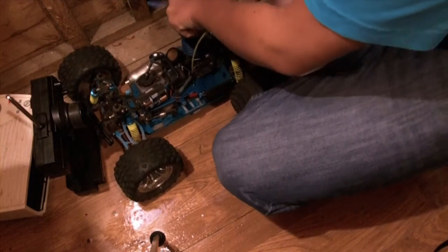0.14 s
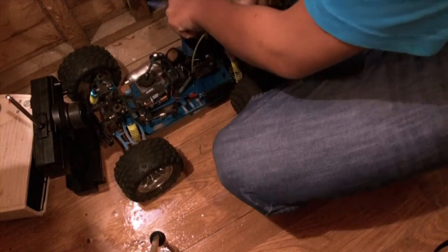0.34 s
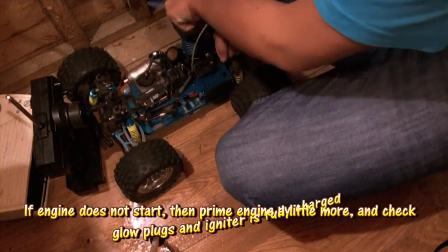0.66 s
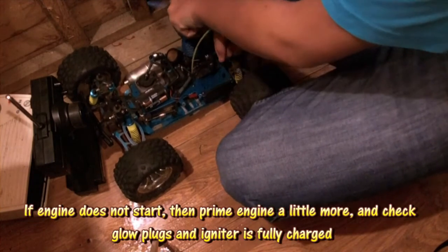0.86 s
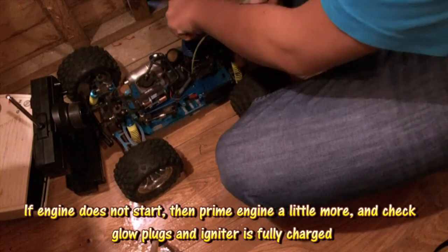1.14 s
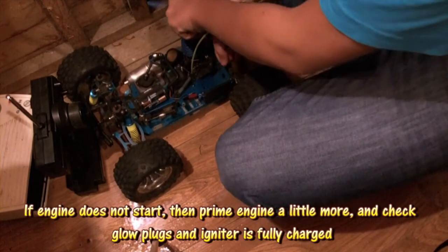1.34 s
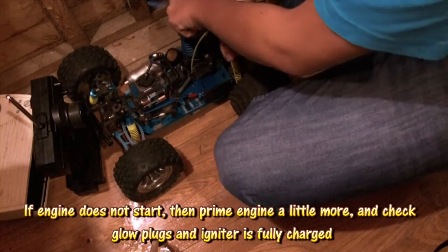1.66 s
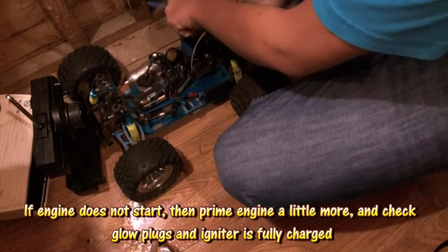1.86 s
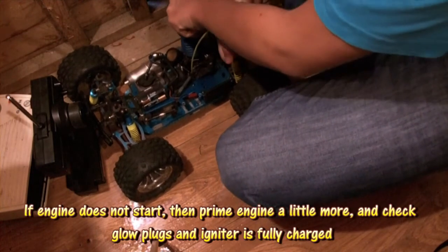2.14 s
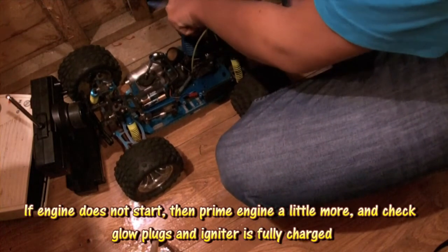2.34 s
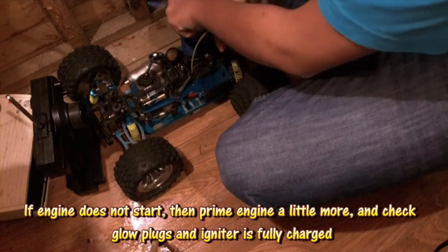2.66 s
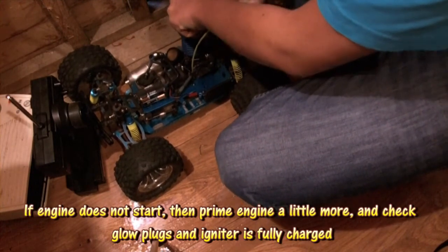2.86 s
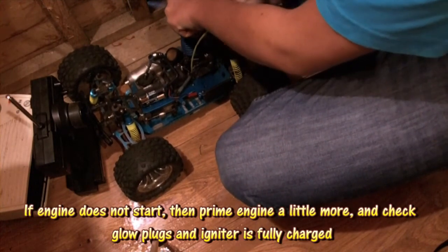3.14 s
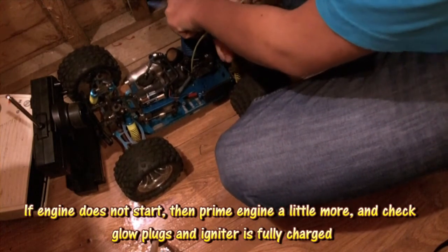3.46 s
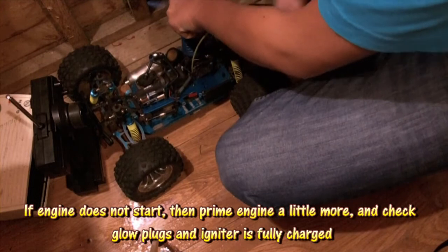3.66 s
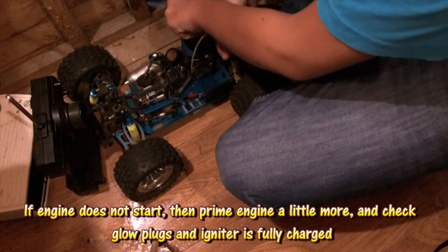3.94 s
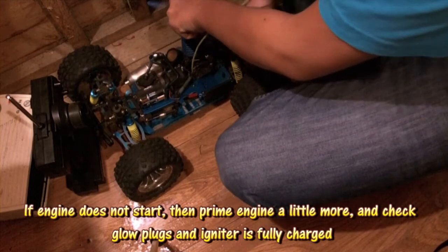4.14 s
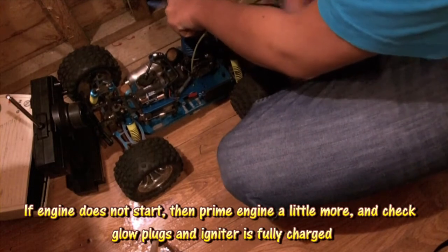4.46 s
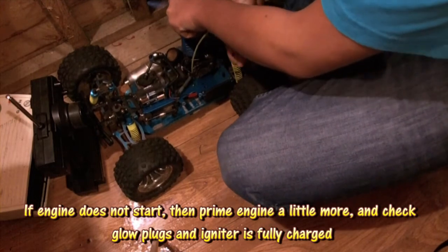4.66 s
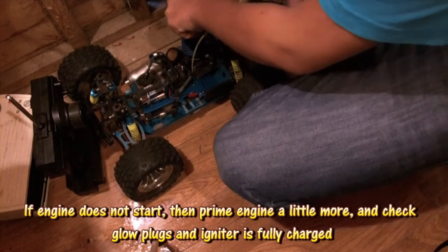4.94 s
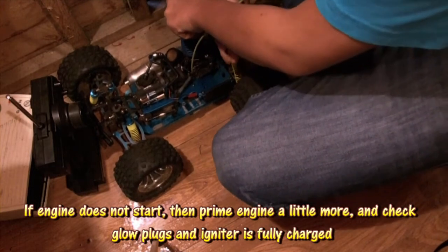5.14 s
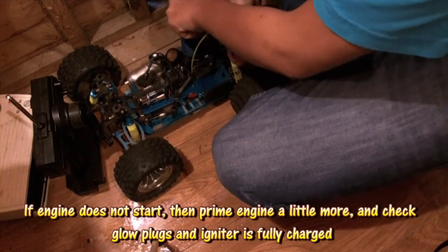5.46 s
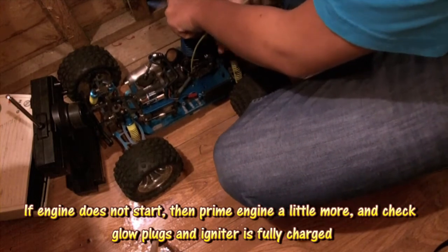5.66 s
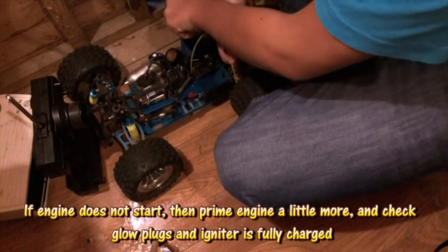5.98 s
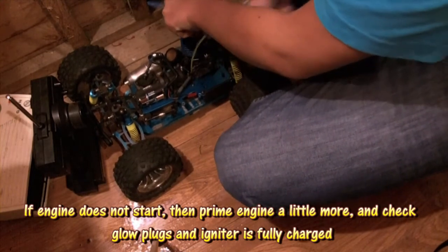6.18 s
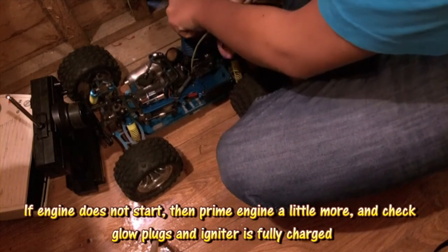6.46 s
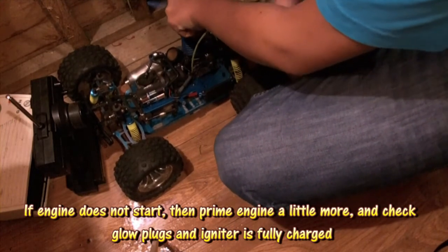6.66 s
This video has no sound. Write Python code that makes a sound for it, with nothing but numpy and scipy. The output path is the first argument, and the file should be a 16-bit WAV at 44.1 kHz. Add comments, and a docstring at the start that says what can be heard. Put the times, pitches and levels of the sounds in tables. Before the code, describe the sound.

Quick, repeated rasps of a starter cord turn over a tiny engine that never catches, the handle clacking back between pulls.

```python
"""A model car's pull-starter, yanked fifteen times; the cold glow engine never fires.
Small wooden shed, microphone just above the car. Each yank snaps the cord taut, the starter bites,
and three or four compression strokes puff through the silencer while the cord rasps out.
The spring winds the cord back and the handle clacks home. Hands and car shift with dull taps,
the close walls answer, and a soft room tone lies underneath."""
import sys
import numpy as np
from scipy import signal
from scipy.fft import rfft, irfft
from scipy.io import wavfile

SR = 44100
rng = np.random.default_rng(int(sys.argv[2]) if len(sys.argv) > 2 else 0)


def transcribe(u):
    """Save the signal u as a 16-bit wav file named by the first command-line argument.

    u: samples, shape (n,) or (channels, n), limited to [-1, 1]; the rate is SR.
    q: integer samples, one column per channel.
    """
    v = np.clip(np.atleast_2d(u).T, -1, 1)
    q = np.round(v * 32767).astype(np.int16)
    wavfile.write(sys.argv[1], SR, q)


N = 300497
TIME = np.arange(N) / SR
FULL_RUN_S = .076  # cord run of a full yank

# yanks: bite t/s, relative level/dB, cord run/s, taut snap's lead on the bite/s, relative snap level/dB
YANKS = [ (.2570, 3.5, 0.059, 0.042, -42.5), (1.0939, 2.5, 0.074, 0.04, -40.5),
         (1.5842, 4, 0.063, 0.051, -42.5), (2.0200, 3, .063, .055, -50), (2.4480, 3.5, 0.063, 0.06, -43.5),
         (2.8720, 2.5, 0.067, .053, -46), (3.3056, 3, 0.059, .048, -41.5), (3.7212, 3.5, 0.074, .042, -37),
         (4.1477, 4, 0.077, .048, -40.5), (4.5990, 3.5, 0.073, 0.04, -33.5),
         (5.0026, 3.5, .076, 0.0454, -36.5), (5.4281, 3.5, 0.071, 0.039, -31.5),
         (5.8692, 3.5, 0.078, .0385, -35), (6.3292, 4, 0.058, 0.051, -55), (6.7145, 3.5, .082, .037, -33)]
# crank pace in a full yank: stroke to stroke/s
STROKE_GAPS = [.0203, .0184, .0196]
# handle clacking home: t/s, relative level/dB, treble/dB
HANDLE_CLACKS = [(0.4113, -42.5, 8), (1.252, -35, -13), (1.721, -37, 5), (2.141, -31, 2), (2.584, -28, 1.5),
                 (3.003, -29.5, 6.5), (3.436, -29.5, 5.5), (3.8815, -30, 2), (4.2788, -27, 4),
                 (4.728, -33, -13), (5.181, -51, 20), (5.5606, -31, 1), (6.011, -27.5, 1.5),
                 (6.451, -32, 2)]
# car and hands shifting: t/s, level/dB, f/Hz
HANDLING_TAPS = [(0.038, -45, 1600), (.075, -52, 1970), (.672, -43.5, 1740), (0.806, -47, 1620),
                 (.8362, -36, 1590), (0.9352, -43, 1070), (1.0534, -37, 1580), (2.703, -47.5, 1520),
                 (2.842, -40.5, 1070), (3.074, -40, 1070)]
# room tone at the microphone: t/s, level/dB
ROOM_LEVELS = [(0, -58.5), (1.6, -60), (3.6, -58), (5.3, -57.5), (6.8, -57.5)]
# spectra of the sources: f/Hz, relative level/dB
ROOM_SPECTRUM = [(12, -32), (20, -14), (68, -17.5), (137, -21), (238, -8.5), (439, -6), (614, -3),
                 (985, -1), (1070, -7), (1200, -4), (1920, -6.5), (2540, -14), (5850, -14), (13500, -20),
                 (15500, -23)]
TAUT_SPECTRUM = [(180, -13.5), (300, -1.5), (1300, -8), (2000, 6), (2280, 0), (2690, 5), (3570, -1),
                 (3940, 3.5), (6680, -5.5), (9930, 5), (15500, -35)]
RASP_SPECTRUM = [(40, -25.5), (110, -38), (200, -18.5), (450, 0.5), (620, -7.5), (1000, -3), (1800, 1),
                 (2700, -7.5), (3800, -3.5), (6500, -5), (9000, -1.5), (11000, -3), (13300, -21.5),
                 (15200, -24)]
CLACK_SPECTRUM = [(88, -49), (150, -26.5), (827, -6), (1060, -1.5), (1220, -1), (1660, -3), (1800, 1.5),
                  (2140, -5), (2600, -4), (4930, -13.5), (7270, -13), (10900, -21), (15500, -42)]
TAP_SPECTRUM = [(100, -14), (300, 1), (500, 8), (800, 6), (1500, 7.5), (3000, -.5), (6000, -10.5),
                (9000, -5), (15000, -31)]
SCRAPE_SPECTRUM = [(100, -7.5), (400, .5), (750, -19), (1020, 8.5), (1300, -.5), (1950, -3.5),
                   (3000, -7.5), (12000, -18.5)]
# resonances of crankcase, starter housing and chassis: f/Hz, width/Hz, boost/dB
BODY_MODES = [(688, 40, 5), (885, 40, 4.5), (995, 45, 6), (1208, 50, 3.5), (1535, 70, 4.5), (1797, 60, 7.5),
              (1965, 110, 9.5), (3510, 180, 3.5), (3950, 170, 4.5), (5250, 400, 3), (5720, 300, 2.5),
              (7080, 300, 2), (8560, 180, 4.5), (9000, 150, 2), (9660, 150, 2.5), (12920, 170, 13)]
# the silencer's two chambers: f/Hz, width/Hz
SILENCER_MODES = [(375, 52), (442, 48)]
# chassis and floorboards under the car: f/Hz, width/Hz, level against the pop/dB
FLOOR_MODES = [(198, 26, -31), (218, 24, -28), (258, 35, -24), (502, 25, -18), (688, 40, -22)]
# nearest walls: delay/ms, relative gain
WALL_ECHOES = [(10.35, .3), (14.82, .9), (16.1, .72), (20.95, -.28)]


def undb(db):
    """Decibels to gain."""
    return 10 ** (np.asarray(db) / 20)


def unit(x):
    """Scale to rms 1."""
    return x / np.sqrt(np.mean(x ** 2))


def convolve(x, response):
    """Pass a sound through an impulse response."""
    return signal.fftconvolve(x, response)[:N]


def colour(x, spectrum, peaks=()):
    """Causal filter of unit power from a smooth spectrum with resonances on top."""
    bins_hz = np.maximum(np.fft.rfftfreq(8192, 1 / SR), 1)
    hz, db = np.transpose(spectrum)
    curve_db = np.interp(np.log(bins_hz), np.log(hz), db)
    for centre, width, boost in peaks:
        curve_db += boost / (1 + (2 * (bins_hz - centre) / width) ** 2)
    cepstrum = irfft(np.log(undb(curve_db)))
    half = len(cepstrum) // 2
    cepstrum[1:half] *= 2  # fold to minimum phase
    cepstrum[half + 1:] = 0
    response = irfft(np.exp(rfft(cepstrum)))
    return convolve(x, response / np.linalg.norm(response))


def resonate(x, hz, width):
    """One resonance, gain 1 at its centre."""
    return signal.lfilter(*signal.iirpeak(hz, hz / width, fs=SR), x)


def treble(x, hz):
    """The part of a sound above a gentle corner."""
    return signal.lfilter(*signal.butter(1, hz, "high", fs=SR), x)


def burst(start, fade_s, rise_s=.0014):
    """Envelope of a quick rise and an exponential fade."""
    out = np.zeros(N)
    span = slice(int(start * SR), int((start + .5) * SR))
    age = np.maximum(TIME[span] - start, 0)
    out[span] = (1 - np.exp(-age / rise_s)) * np.exp(-age / max(fade_s, rise_s))
    return out


def grit(rate, spread_db):
    """Dense tiny slips of uneven size, about rate a second."""
    slips = (rng.random(N) < rate / SR) * rng.standard_normal(N)
    return unit(slips * undb(spread_db * rng.standard_normal(N)))


def wander(rate):
    """A smooth random curve with rate new values a second."""
    moments = np.arange(0, N / SR, 1 / rate)
    return np.interp(TIME, moments, rng.standard_normal(len(moments)))


def shed(x, wet_db, echo_db=-10, build_s=.0012, t60_s=.23, sway_hz=1.7):
    """Close wooden walls answer with a few echoes and a short tail that shifts as the arm moves."""
    age = TIME[:SR // 2]
    early = np.zeros(len(age))
    for ms, gain in WALL_ECHOES:
        early[round(ms * SR / 1000)] += undb(echo_db) * gain
    out = x + convolve(x, early)
    fade = undb(-60 * age / t60_s) * (1 - np.exp(-age / build_s))
    for phase in (0, np.pi / 3, 2 * np.pi / 3):  # three tails crossfade at constant power
        tail = rng.standard_normal(len(age)) * fade
        share = np.sqrt(2 / 3) * np.cos(2 * np.pi * sway_hz * TIME + phase)
        out += undb(wet_db) * share * convolve(x, tail / np.linalg.norm(tail))
    return out


def rattle(events, spectrum, fade_s, gain_db, snap_db, snap_s):
    """A snap and a flurry of contacts ring the starter housing; events: t/s, level/dB, treble/dB."""
    force, bright = np.zeros((2, N))
    for start, db, treble_db in events:
        flurry = burst(start - .001, fade_s, rise_s=.0031)
        snap = undb(snap_db) * burst(start, snap_s)
        blow = undb(db + gain_db) * (flurry + snap)
        force += blow
        bright += blow * (undb(treble_db) - 1)
    contacts = grit(rate=12000, spread_db=1) * undb(1.5 * wander(rate=160))
    # small parts stir the body less than a yank
    modes = [(hz, width, db / 2) for hz, width, db in BODY_MODES]
    return colour(force * contacts + treble(bright * contacts, hz=3840), spectrum, modes)


def room_tone():
    """The shed's own air, a steady, soft rush."""
    level_db = np.interp(TIME, *np.transpose(ROOM_LEVELS))
    return undb(level_db) * colour(rng.standard_normal(N), ROOM_SPECTRUM)


def handling_taps(push_s=.0024, ring_db=-12.5):
    """Soft, dull knocks of plastic and fingers leave the chassis ringing briefly."""
    out = np.zeros(N)
    touch = colour(rng.standard_normal(N), TAP_SPECTRUM)
    for start, db, hz in HANDLING_TAPS:
        push = np.exp(-((TIME - start) / push_s) ** 2 / 2)
        envelope = push + undb(ring_db) * burst(start + push_s, fade_s=.026)
        broad = unit(resonate(touch, hz, width=1900))
        narrow = unit(resonate(touch, hz, width=hz / 10))
        knock = envelope * (broad + .22 * narrow)
        out += undb(db) * knock * np.linalg.norm(envelope) / np.linalg.norm(knock)
    return out


def cord_snaps(middling_db=-37.5, brighten=.63):
    """The slack runs out and the cord snaps taut, brighter the harder it snaps."""
    snaps = [(bite - lead, db, -6 + brighten * (db - middling_db)) for bite, _, _, lead, db in YANKS]
    housing = rattle(snaps, TAUT_SPECTRUM, fade_s=.0095, gain_db=-.5, snap_db=-21, snap_s=.0025)
    return shed(housing, wet_db=-12.5)


def cord_slide(level_db=-50, lead_s=.023):
    """Just before the bite the cord slides with a soft, low scrape."""
    ramp_s = [-1.3 * lead_s, -.7 * lead_s, 0]
    swell = sum(np.interp(TIME - bite, ramp_s, [0, .8, 1], right=0) for bite, *_ in YANKS)
    return undb(level_db) * swell * colour(rng.standard_normal(N), SCRAPE_SPECTRUM, BODY_MODES)


def strokes(bite, run, carry_s=.006):
    """Moments at which the piston passes compression: three in a short yank, four in a full one."""
    slowing = (FULL_RUN_S / run) ** .296  # shorter yanks turn the crank a little slower
    delays = np.cumsum([0, *STROKE_GAPS]) * slowing
    return bite + delays[delays < run - carry_s]  # some cord must remain to carry the piston over


def cranking(rasp_db=-28.5, spit_db=-29, treble_db=-6):
    """The cord rasps louder as the hand speeds up, and air spits at each stroke."""
    cord, air = np.zeros((2, N))
    for bite, db, run, *_ in YANKS:
        speed = np.interp(TIME - bite, [0, .72 * run, run], [.51, 1, .95], left=0, right=0)
        coast = .63 * burst(bite + run, fade_s=.0081)
        clutch = undb(-6) * burst(bite, fade_s=.0013, rise_s=.00051)  # the one-way clutch snaps shut
        cord += undb(db) * (speed + coast + clutch)
        air += undb(db) * sum(burst(moment, fade_s=.0064) for moment in strokes(bite, run))
    rasp = undb(rasp_db) * cord * grit(rate=12000, spread_db=1)
    spit = undb(spit_db) * air * rng.standard_normal(N)
    spit += .49 * treble(spit, hz=7000)  # escaping air is brighter than the cord
    sound = colour(rasp + spit, RASP_SPECTRUM, BODY_MODES)
    return sound + (undb(treble_db) - 1) * treble(sound, hz=3350)


def silencer_pops(gain_db=-41.8, swell_db=1.3, lag_s=.00324):
    """Each stroke drops a slug of unburnt air into the silencer, which answers with a hollow pop."""
    slugs = np.zeros(N)
    for bite, _, run, *_ in YANKS:
        for k, moment in enumerate(strokes(bite, run)):
            # a long yank drives harder, and its middle strokes hardest
            swell = undb(swell_db * np.sin(np.pi * k / len(STROKE_GAPS)))
            slugs[int((moment + lag_s) * SR)] = -swell * np.sqrt(run / FULL_RUN_S)
    pop = slugs
    for hz, width in SILENCER_MODES:
        pop = resonate(pop, hz, width)
    thud = np.zeros(N)  # the same kick rocks the car on the floorboards
    for hz, width, db in FLOOR_MODES:
        ring = resonate(slugs, hz, width)
        thud += undb(db) * unit(resonate(ring, hz, 5 * width))
    # so small a body radiates almost no bass
    low_cut = signal.butter(4, 165, "high", fs=SR, output="sos")
    radiated = undb(gain_db) * signal.sosfilt(low_cut, unit(pop) + thud)
    # the outlet faces a wall, so its echoes are almost as strong as the direct pop
    return shed(radiated, wet_db=-14, echo_db=0, build_s=.015)


def spool_whirr(gain_db=-36.5, rewind_s=.07):
    """The spool chatters unevenly as the spring takes the cord back."""
    envelope = np.zeros(N)
    ramp_s = [0, rewind_s / 4, rewind_s / 2, rewind_s]
    for bite, _, run, *_ in YANKS:
        envelope += np.interp(TIME - bite - run, ramp_s, [1.16, .81, .24, 0], left=0)
    flutter_db = 3.1 * wander(rate=200)
    chatter = colour(grit(rate=3600, spread_db=1.5), CLACK_SPECTRUM, BODY_MODES)
    return undb(gain_db + flutter_db) * envelope * chatter


def return_clacks(knock_after_s=.119):
    """The spool knocks softly as it winds back, then the handle clacks home."""
    knocks = [(bite + knock_after_s, -40.5, -3) for bite, *_ in YANKS]
    events = knocks + HANDLE_CLACKS
    housing = rattle(events, CLACK_SPECTRUM, fade_s=.01, gain_db=-3, snap_db=-10.5, snap_s=.0029)
    return shed(housing, wet_db=-7)


def scene():
    """Starter, engine and shed, in mono from just above the car."""
    rattles = cord_snaps() + return_clacks()
    pops = silencer_pops()
    starter = shed(cranking() + spool_whirr(), wet_db=-7.5, echo_db=-15)
    return (rattles + pops + starter + cord_slide() + handling_taps() + room_tone())[None]


def record(dry, notch_hz=7900, top_hz=15300):
    """The camera's microphone channel has a narrow notch in the treble and cuts the top."""
    notched = signal.lfilter(*signal.iirnotch(notch_hz, Q=55, fs=SR), dry)
    high_cut = signal.ellip(10, .2, 70, top_hz, fs=SR, output="sos")
    return signal.sosfilt(high_cut, notched)


dry = scene()
out = record(dry)
transcribe(out)
```